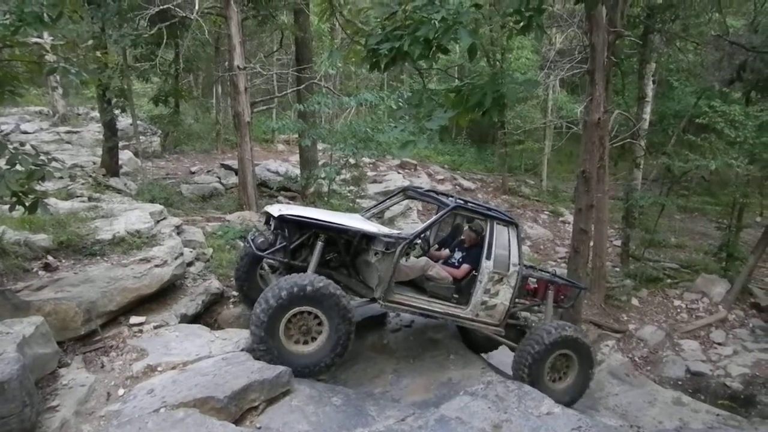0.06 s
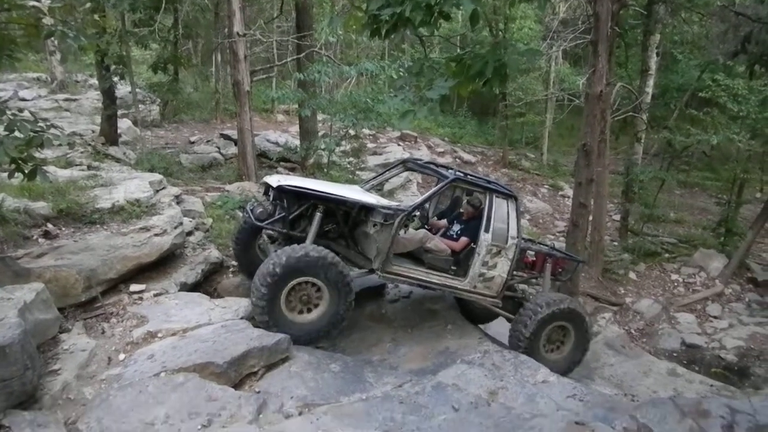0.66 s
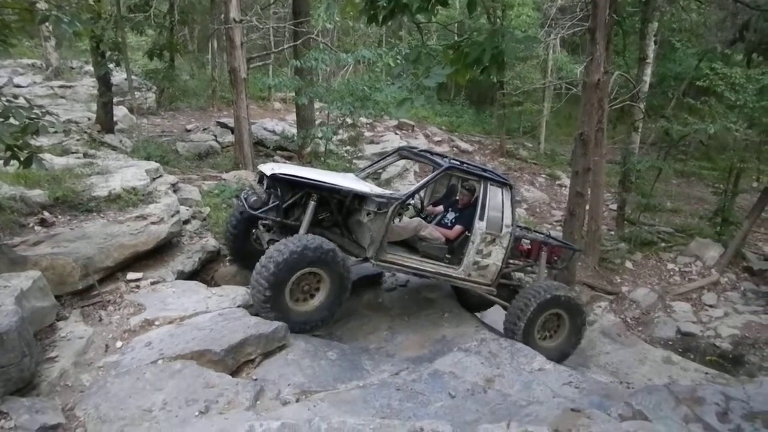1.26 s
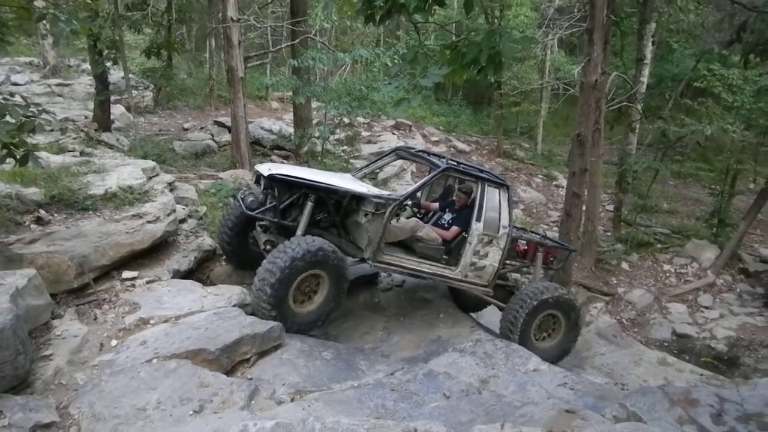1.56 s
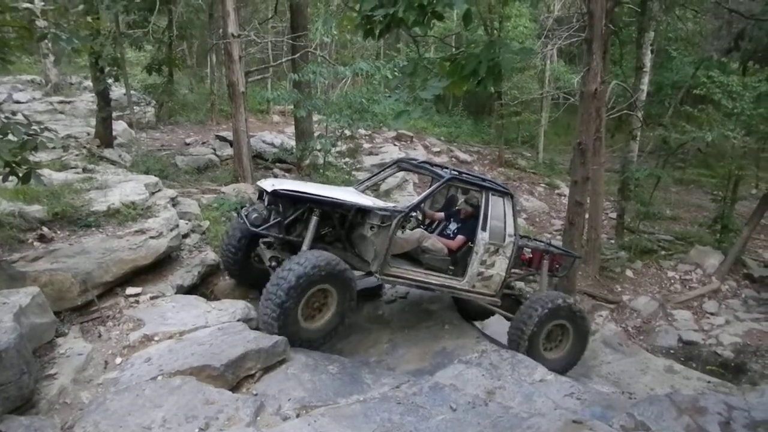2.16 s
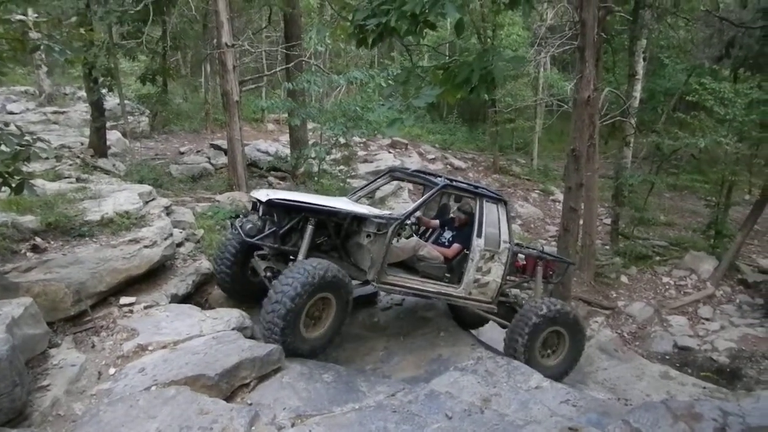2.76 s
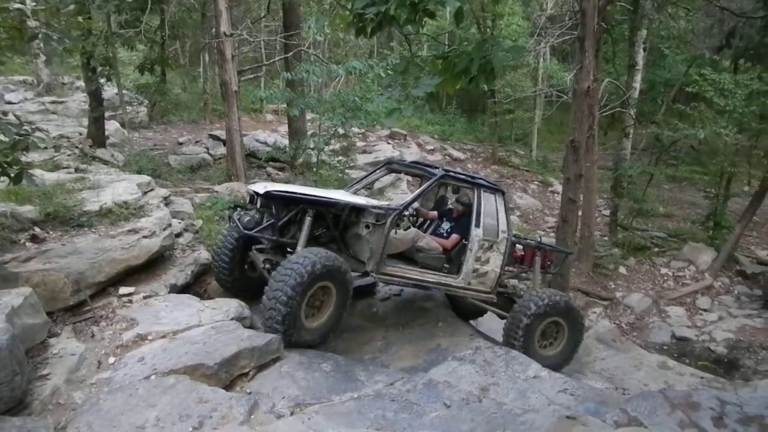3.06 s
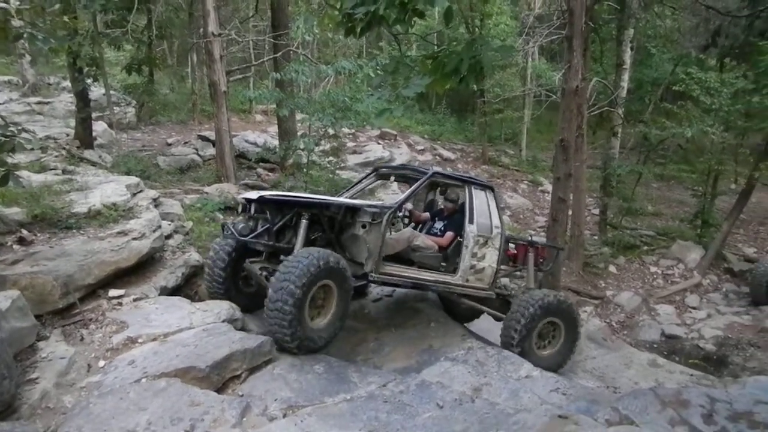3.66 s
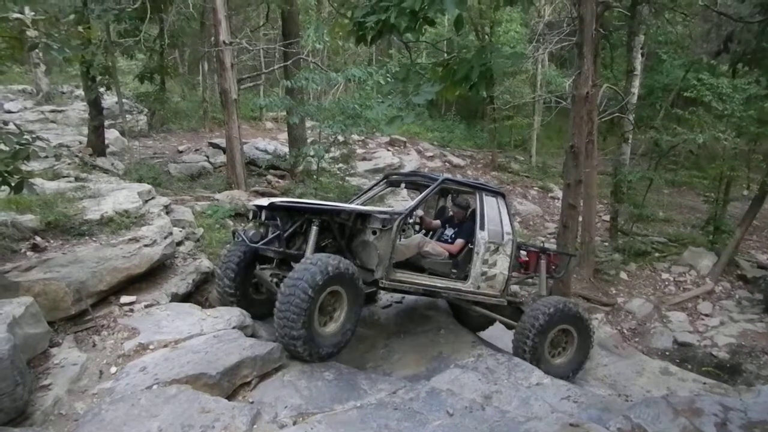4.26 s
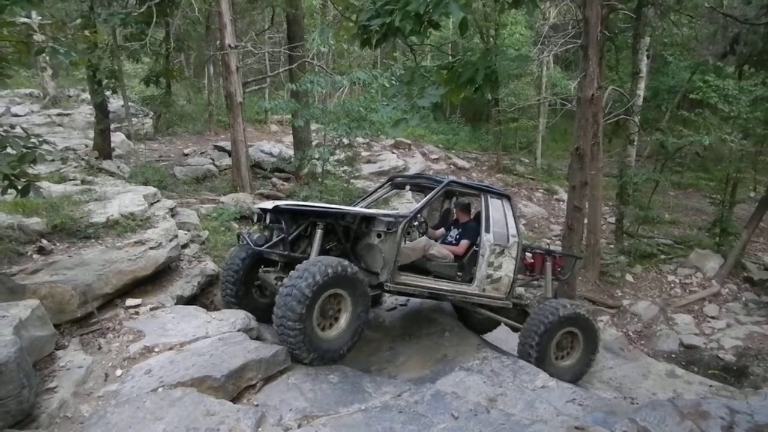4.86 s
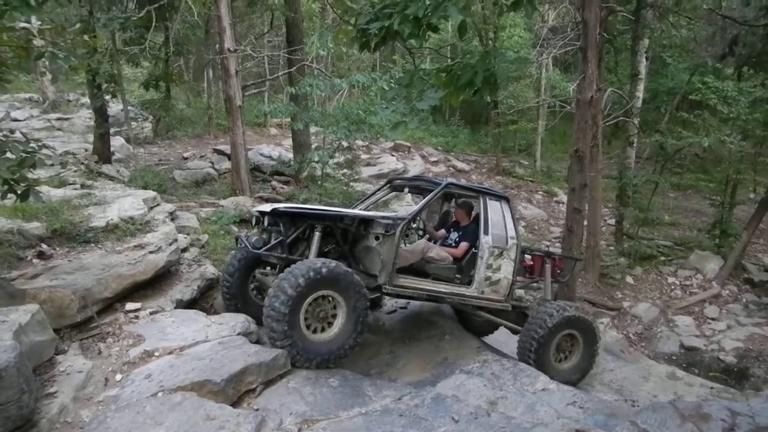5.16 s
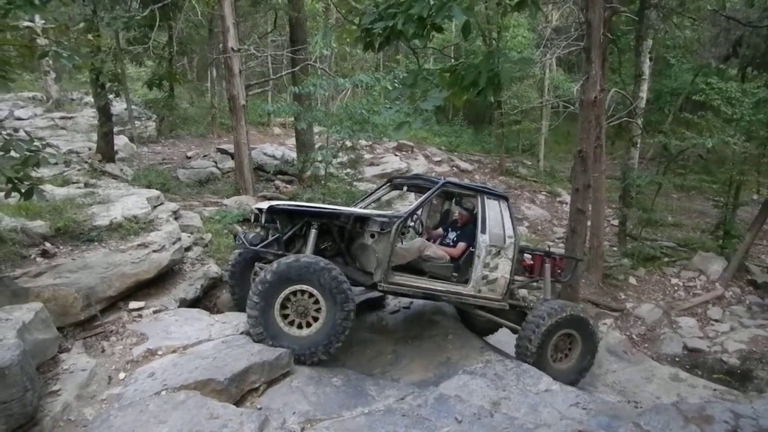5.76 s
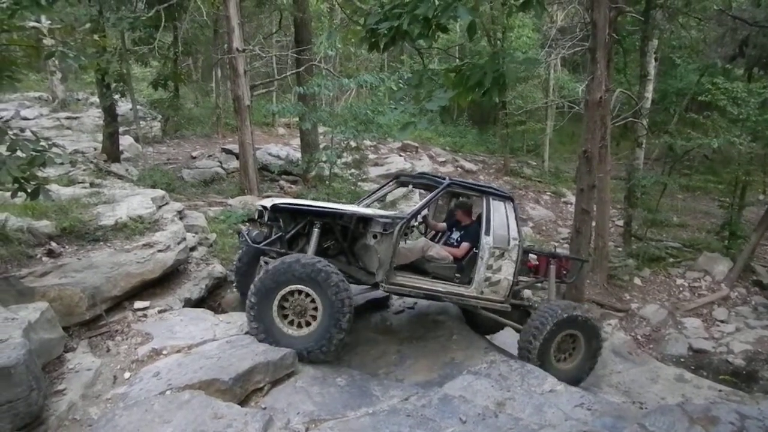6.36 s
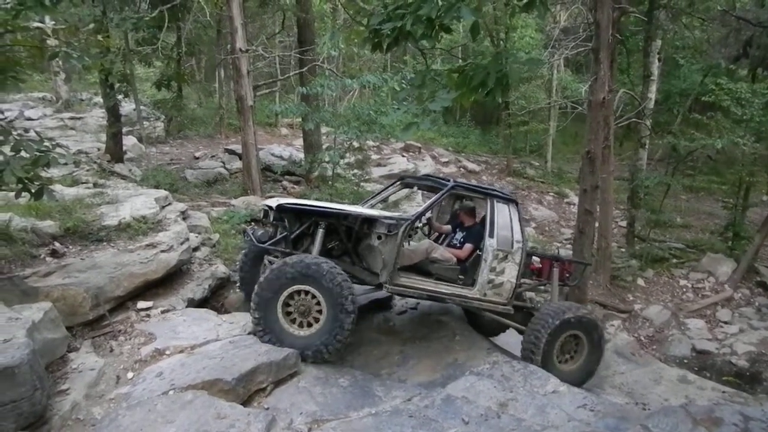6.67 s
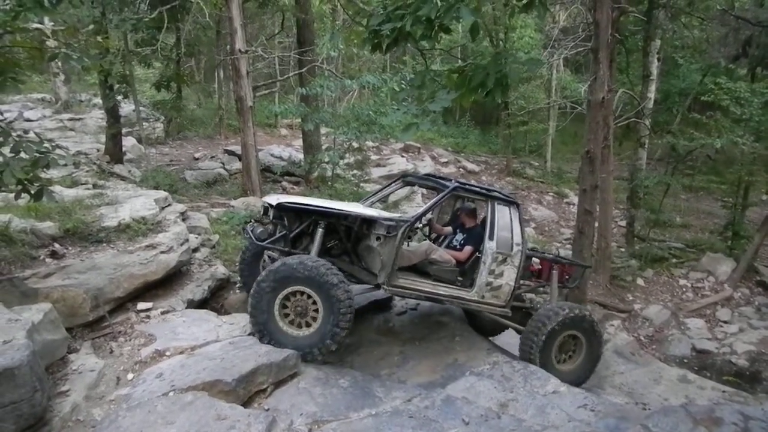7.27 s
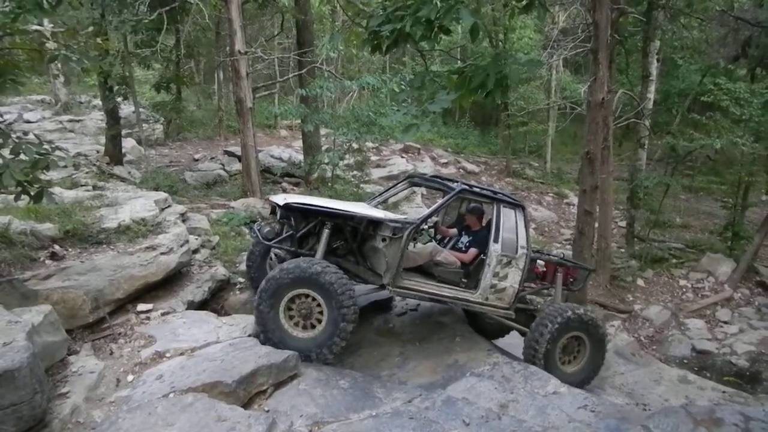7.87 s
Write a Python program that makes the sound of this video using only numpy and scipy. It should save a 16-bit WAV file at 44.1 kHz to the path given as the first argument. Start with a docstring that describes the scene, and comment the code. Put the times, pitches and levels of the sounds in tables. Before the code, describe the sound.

A rock buggy's deep V8 drones a few metres away on a woodland trail, with intake and fan hiss underneath. A thin metal squeal sounds early, and tyres and joints give short raspy squeaks. The engine rasps harder under load as grit cracks beneath the tread, and the gears hum briefly. Near the end the revs sink to a lumpy throb while a tyre scrubs faintly on the rock.

```python
"""A deep V8 drone, as a rock buggy crawls up a stone ledge in a wood a few metres away.
Pulses of exhaust gas make the drone. It rasps as the engine works harder, then slows to a lumpy throb.
The air intake and fan hiss underneath, and the gears hum for a moment. Metal sticks and slips in one
long squeal, tyres and joints squeak, grit cracks under the tread, and the tread scrubs on the rock."""
import sys
import numpy as np
from scipy.fft import rfft, irfft, next_fast_len
from scipy.io import wavfile
from scipy.ndimage import uniform_filter1d, map_coordinates

SR = 44100
rng = np.random.default_rng(int(sys.argv[2]) if len(sys.argv) > 2 else 0)


def bounce(signal):
    """Save signal as a 16-bit WAV file at the path given by the first command-line argument."""
    frames = np.transpose(np.atleast_2d(signal))
    limited = np.clip(frames, -1, 1)
    pcm = np.round(limited * 32767).astype(np.int16)
    wavfile.write(sys.argv[1], SR, pcm)


N = 353329


def engine():
    """Speed and load (how hard it works) shape the engine's sound. One cycle is two crankshaft turns."""
    # crankshaft speed, pulled down twice by the ledge: time_s, speed_rpm
    speed = [(0, 2368), (0.35, 2389), (1.05, 2508), (1.7, 2489), (2.55, 2504), (2.8, 2414), (3.3, 2278),
             (3.82, 2292), (4.38, 2380), (4.78, 2485), (5.25, 2431), (5.47, 2364), (6.02, 2304),
             (6.3, 2108), (6.72, 1943), (7.47, 1934), (7.8, 2008), (8, 2033)]
    # effort compared with easy running: time_s, load_db
    load = [(0, -0.9), (0.55, -0.8), (2.1, -1.5), (2.75, 0.5), (3.32, 4.5), (3.58, 3), (3.76, 5), (4.2, 1),
            (4.6, 0.86), (5.08, -1), (5.88, 1.55), (6.2, 4), (6.38, 6.5), (6.52, 4), (6.98, 1.6),
            (7.34, 0.1), (7.55, 3), (8, 4.5)]
    (rpm,), (load_db,) = curves(speed), curves(load)
    cycle_hz = rpm / 120
    angle = 2 * np.pi * np.cumsum(cycle_hz * (1 + 0.001012 * wobble(20))) / SR  # one circle per cycle
    tones = exhaust(angle, cycle_hz, load_db, flutter=0.032, burble=0.1) + gear_hum(angle)
    noise = rasp_and_hiss(angle, rpm, load_db, bank=1.04, firing=0.43, lope=1.0)
    return (tones + noise) * level_dips(depth_db=2.5, recover_s=0.27, fall_s=0.0077)


def exhaust(angle, cycle_hz, load_db, flutter, burble):
    """Gas pulses make tones that the pipe boosts or muffles. Three hold steady, the rest burble."""
    # engine tones: multiple_of_cycle_rate, level_db, extra_db_per_load_db
    # 8 is the firing rate, its neighbours come from uneven cylinders, the top two are a mechanical whine
    engine_tones = [(4, -5, .5), (6, -33.5, 2.15), (7, -25.5, -2), (8, -9, 0.19), (9, -30, 2),
                    (10, -29.5, 1.5), (11, -32, -3.5), (12, -11.5, 0.24), (13, -23.5, 0), (14, -11.5, -0.5),
                    (15, -18.5, 1.2), (16, -1, 1.1), (20, -8.5, 0.64), (21, -14, 0.3), (22, -10, 1.1),
                    (24, -6, -1.6), (46, 2.5, -1.5), (54, 2, 1.2)]
    # the pipe's peaks and notches, which the tones slide through: pitch_hz, gain_db
    pipe = [(64, -30.2), (70, -25.6), (82, -26), (96, -19.5), (106, -1), (133, -7.5), (145, -21),
            (155, -5.3), (166, 0), (185, -12), (194, -6), (211, -9.5), (228, -21.5), (239, -18),
            (250, -25.5), (265, -43), (285, -38.5), (310, -26.5), (338, -37), (391, -37.5), (399, -25.5),
            (419, -29.5), (430, -43), (480, -38), (880, -41), (1100, -50)]
    tones = 0
    for multiple, db, growth in engine_tones:
        k = round(multiple)
        phase = k * angle - 0.15 * k ** 2  # the pipe holds high tones back, spreading each pulse
        level = amp(db + growth * load_db + along(pipe, k * cycle_hz))
        waver = flutter if k in (8, 12, 16) else burble
        tone = (1 + waver * wobble(14)) * np.cos(phase) + waver * wobble(14) * np.sin(phase)
        tones = tones + level * tone
    return np.sqrt(2) * tones


def rasp_and_hiss(angle, rpm, load_db, bank, firing, lope):
    """Exhaust rasp and intake and fan hiss puff with each firing and each row (bank) of cylinders."""
    # tone colours of the rasp and of the hiss: pitch_hz, relative_db
    rasp_colour = [(25, -26), (45, -2.5), (70, -1), (170, 9), (280, -3.5), (430, 2.5), (520, -0.5),
                   (680, 1.5), (1100, -1.5), (1500, -3.5), (2200, -6), (3800, -15), (15000, -45)]
    hiss_colour = [(800, -35), (2000, -11), (2600, 3), (3700, -0.5), (5000, 0), (6300, 2), (7000, -1),
                   (7900, -7.5), (9100, -4.5), (10000, -9.5), (11400, -11), (12600, -6), (14000, -16),
                   (15600, -18)]
    # a slower engine puffs more distinctly: speed_rpm, depth_factor
    puff_depth = [(1940, 0.93), (2530, .27)]
    lumps = lope * (np.cos(angle) + np.cos(3 * angle))
    puffs = bank * np.sin(4 * angle) + firing * np.sin(8 * angle) + lumps
    puff_db = np.interp(rpm, *np.transpose(puff_depth)) * puffs
    surge_db = 1.27 * load_db + 1.06 * wobble(16)  # load and uneven burning move both together
    rasp = amp(-27 + puff_db + surge_db + 0.2 * wobble(12)) * rush(rasp_colour, churn(angle))
    hiss = amp(-35.5 + 0.63 * puff_db + surge_db + 0.33 * wobble(21)) * rush(hiss_colour, churn(angle))
    return rasp + hiss


def churn(angle, repeat=0.42, size=2048):
    """Machine noise: a little repeats with every engine cycle, and all of it rings in the engine bay."""
    # where the engine bay rings: pitch_hz, width_hz, boost_db
    bay = [(887, 17, 7), (1302, 130, 4), (1600, 62, 5), (1982, 66, 5), (2565, 106, 5)]
    position = angle / (2 * np.pi) * size % size
    patterns = rng.standard_normal((2, size))
    repeating = np.array([np.interp(position, np.arange(size), pattern) for pattern in patterns])
    ring = lambda hz: amp(sum(db / (1 + (2 * (hz - centre) / width) ** 2) for centre, width, db in bay))
    return filtered(rng.standard_normal((2, N)) + repeat * repeating, ring)


def level_dips(depth_db, recover_s, fall_s):
    """The sound's level dips abruptly at set moments and creeps back, staying the same on average."""
    # moments when the level dips: time_s
    dips = [.214, .378, .526, .712, .895, 1.05, 1.322, 1.531, 1.82, 2.001, 2.148, 2.36, 2.74, 2.944, 4.671,
            5.029, 5.304, 7.03]
    t = clock()
    dip = lambda s: np.clip((t - s) / fall_s + .5, 0, 1) * np.exp(-np.abs(t - s) / recover_s)
    drop_db = depth_db * sum(dip(s) for s in dips)
    return amp(uniform_filter1d(drop_db, size=SR // 3) - drop_db)


def gear_hum(angle):
    """Loaded gears give a rough, wavering hum while the front tyres climb."""
    # the hum's rise and fall: time_s, level_db
    swell = [(4.45, -58), (4.8, -35.5), (5.7, -33.5), (6.1, -60)]
    # gear tones: multiple_of_cycle_rate, relative_db
    gear_tones = [(22, 1), (24, -8), (28, -2)]
    level_db, = curves(swell)
    tone = lambda phase: (1 + 0.78 * wobble(35)) * np.cos(phase) + .45 * wobble(43) * np.sin(phase)
    return amp(level_db) * unit(sum(amp(db) * tone(round(k) * angle) for k, db in gear_tones))


def metal_squeal(chatter, flicker_db):
    """Dry chassis metal sticks and slips at a sinking, trembling pitch."""
    # course of the squeal: time_s, pitch_hz, level_db
    course = [(1.0, 1390, -42), (1.06, 1377, -41), (1.18, 1410, -33.5), (1.3, 1390, -47), (1.42, 1356, -39),
              (1.53, 1320, -38), (1.6, 1310, -38)]
    # its tones: multiple_of_pitch, relative_db
    tones = [(1, 0.5), (2, -2), (3, -1), (4, -9), (5, -11), (6, -16), (7, -20), (8, -17), (9, -11),
             (10, -13), (11, -21)]
    hz, level_db = curves(course)
    tremble = 0.0026 * wobble(29.43) + chatter * wobble(500)
    phase = 2 * np.pi * np.cumsum(hz * (1 + tremble)) / SR
    sounding = (clock() > course[0][0]) & (clock() < course[-1][0])
    tone = lambda k, db: amp(db + flicker_db * wobble(20)) * np.cos(k * phase + rng.normal(0, 0.15))
    left_right = [sum(tone(round(k), db) for k, db in tones) for _ in range(2)]
    return amp(level_db) * sounding * np.array(left_right)


def squeaks(fade_share, chatter_db, waver):
    """Tyres and joints stick and slip under the weight, making bands of noise that stutter and waver."""
    # short raspy squeaks: start_s, length_s, pitch_hz, level_db, width_hz
    slips = [(0.645, 0.11, 3470, -39, 90), (0.758, 0.26, 3530, -44, 200), (1.593, 0.091, 3730, -40.5, 110),
             (2.211, 0.32, 3237, -43, 200), (2.227, 0.35, 3680, -37.5, 1800), (2.25, 0.33, 7130, -46, 400),
             (2.2, .37, 13100, -47, 2800), (2.513, 0.045, 4400, -39, 160), (2.871, 0.54, 2900, -38.5, 600),
             (3.837, .04, 3380, -34, 450), (3.995, 0.071, 3440, -36, 500), (4.27, 0.43, 3548, -40.5, 900),
             (4.3, 0.37, 13600, -54, 1200), (4.844, 0.2, 4780, -47, 200), (5.011, 0.088, 12900, -51, 80),
             (5.192, 0.086, 9650, -48, 497), (5.337, 0.063, 6720, -38, 90), (5.484, 0.16, 6680, -42, 90.1),
             (5.68, 0.16, 10520, -45, 150)]
    out, t = np.zeros((2, N)), clock()
    for start, length, hz, db, width_hz in slips:
        on = (t > start) & (t < start + length)
        offset_hz = np.fft.fftfreq(on.sum(), 1 / SR)
        random_phases = np.exp(2j * np.pi * rng.random((2, on.sum())))
        low_noise = np.fft.ifft(random_phases / (1 + (2 * offset_hz / width_hz) ** 4))
        phase = 2 * np.pi * np.cumsum(hz * (1 + waver * wobble(25)[on])) / SR
        band = unit((low_noise * np.exp(1j * phase)).real)  # moves the noise up to the squeak's pitch
        fade = np.clip(np.minimum(t[on] - start, start + length - t[on]) / (fade_share * length), 0, 1)
        blended = unit(band + .6 * band[::-1])  # left and right partly mixed
        out[:, on] += fade * amp(db + chatter_db * wobble(40)[on]) * blended
    return out


def grit():
    """Small stones crack under a tyre in short, bright crunches."""
    # crunches: start_s, level_db, decay_s (time to fall by 60 dB)
    crunches = [(3.3, -28, 0.21), (3.47, -27, 0.15), (3.74, -27, 0.12), (3.83, -30, 0.11),
                (5.95, -26.5, 0.4), (7.604, -29, 0.063)]
    # their tone colour: pitch_hz, relative_db
    colour = [(800, -20), (3500, 6.5), (7000, -1.5), (13500, -13), (16000, -20)]
    t = clock()
    bursts = sum((t > start) * amp(db - 60 * np.abs(t - start) / decay) for start, db, decay in crunches)
    crackle = amp(1.3 * wobble(300))
    return bursts * crackle * rush(colour)


def tread_scrub():
    """The tread rubs on the rock with a thin hiss once the buggy leans into the ledge."""
    # loudness of the rubbing: time_s, level_db
    rubbing = [(5.88, -83), (5.97, -40), (7, -45.5), (8, -46)]
    # its tone colour: pitch_hz, relative_db
    colour = [(4000, -28), (7800, 5), (10500, 3.5), (12500, -21), (16000, -20)]
    level_db, = curves(rubbing)
    return amp(level_db + wobble(21)) * rush(colour)


def rush(colour, source=None):
    """Stereo noise of average (rms) level 1 in a given tone colour, spreading wider in the treble."""
    # how alike left and right are: pitch_hz, likeness (1 = the same)
    likeness = [(900, 0.97), (2000, 0.95), (4000, 0.63), (6000, 0.62), (9000, 0.07), (14000, 0.14)]
    source = rng.standard_normal((2, N)) if source is None else source
    spread = lambda hz: np.arccos(np.clip(along(likeness, hz), -1, 1)) / 2
    gains = lambda hz: amp(along(colour, hz)) * [np.cos(spread(hz)), np.sin(spread(hz))]
    mid, side = filtered(source, gains)
    return unit(np.array([mid + side, mid - side]))


def amp(db):
    """Turn decibels into a gain."""
    return 10 ** (np.asarray(db) / 20)


def unit(x):
    """Scale to an average (rms) level of 1."""
    return x / np.sqrt(np.mean(x ** 2) + 1e-20)


def clock():
    """The time of each sample in seconds."""
    return np.arange(N) / SR


def along(points, hz):
    """Read between (pitch_hz, value) points, with octaves evenly spaced."""
    pitches, values = np.transpose(points)
    return np.interp(np.log(hz + 1), np.log(pitches + 1), values)


def curves(rows):
    """One value per sample for each column after the time."""
    times, *columns = np.transpose(rows)
    return [np.interp(clock(), times, column) for column in columns]


def wobble(rate):
    """A smooth curve through `rate` random values a second."""
    knots = rng.standard_normal(int(N * rate / SR) + 4)
    fine = map_coordinates(knots, [np.arange(len(knots) * 10) / 10])
    return np.interp(clock() * rate * 10, np.arange(len(fine)), fine)


def filtered(x, response):
    """Scale each frequency in x by response(hz)."""
    size = next_fast_len(N + SR // 2)
    return irfft(rfft(x, size) * response(np.fft.rfftfreq(size, 1 / SR)), size)[..., :N]


def scene():
    """The engine, with the chassis and tyre noises on top."""
    return (engine() + metal_squeal(chatter=0.0025, flicker_db=2.5)
            + squeaks(fade_share=0.095, chatter_db=2.0, waver=0.0051) + grit() + tread_scrub())


def record(dry):
    """Give left and right slightly different colour and bass timing, and cut the highest treble."""
    # how much louder the left side is: pitch_hz, left_minus_right_db
    balance = [(60, 1.1), (160, .5), (900, -.3), (2500, 1.5), (5000, 3), (9000, 3.5), (13000, -6.5)]
    # how far the right side's wave runs ahead: pitch_hz, lead_radians
    right_lead = [(60, .3), (160, .18), (900, 0)]
    half, top_hz = np.array([[.5], [-.5]]), 15650
    gain = lambda hz: amp(half * along(balance, hz)) * (hz < top_hz)
    shift = lambda hz: np.exp(-1j * half * along(right_lead, hz))
    return filtered(dry, lambda hz: gain(hz) * shift(hz))


dry = scene()
out = record(dry)
bounce(out)
```